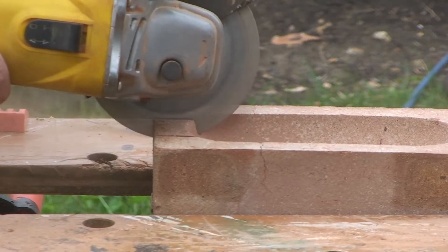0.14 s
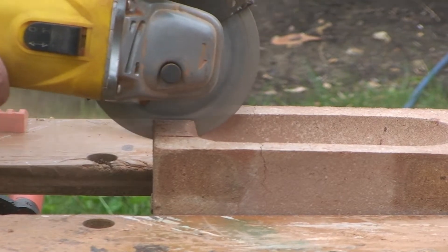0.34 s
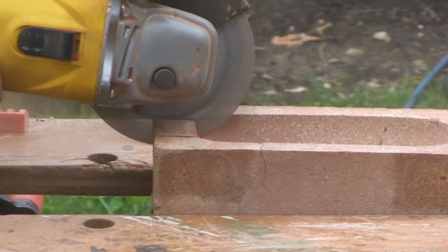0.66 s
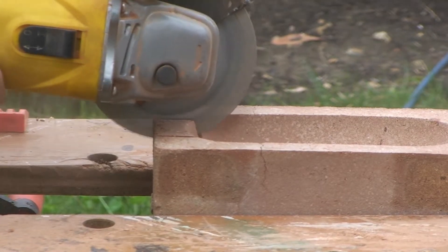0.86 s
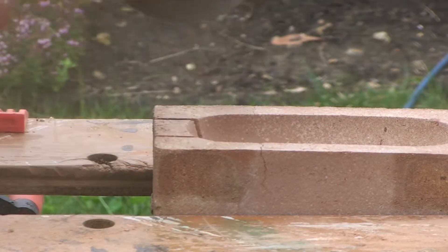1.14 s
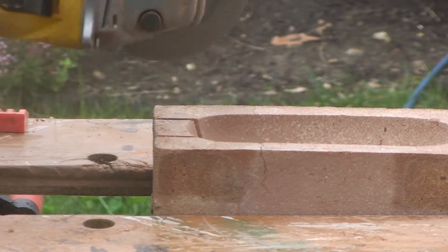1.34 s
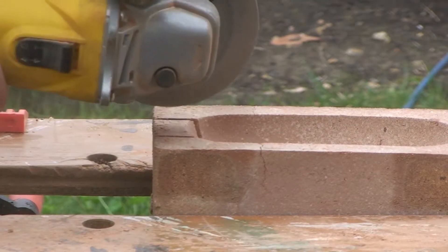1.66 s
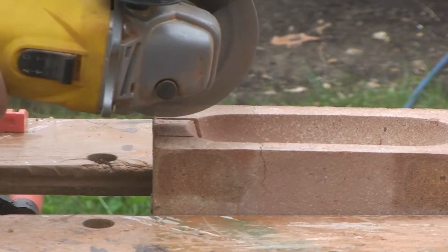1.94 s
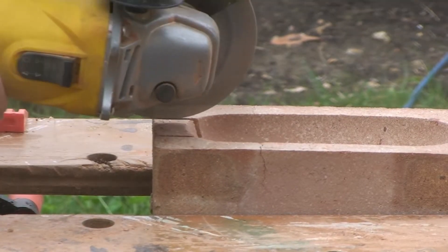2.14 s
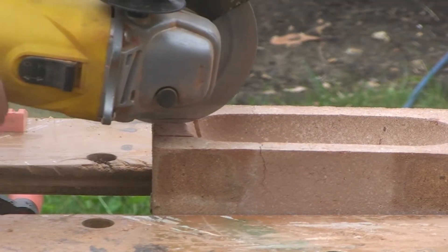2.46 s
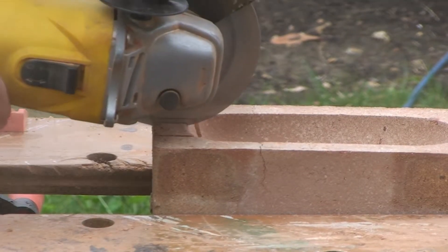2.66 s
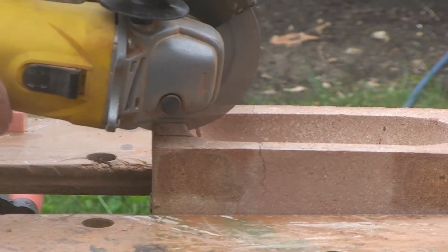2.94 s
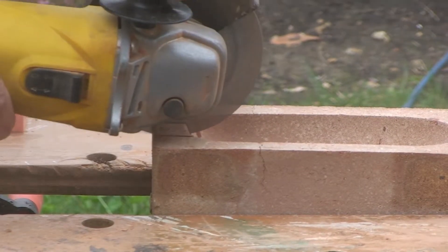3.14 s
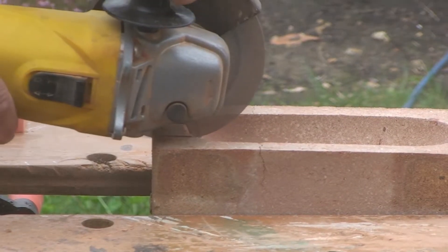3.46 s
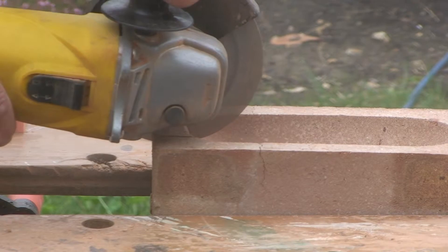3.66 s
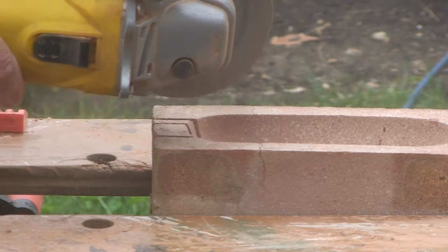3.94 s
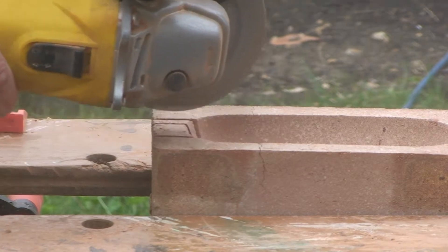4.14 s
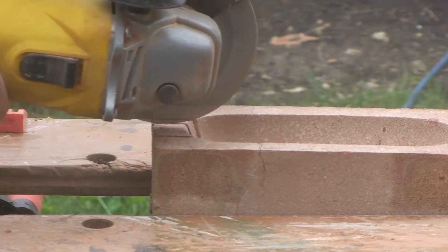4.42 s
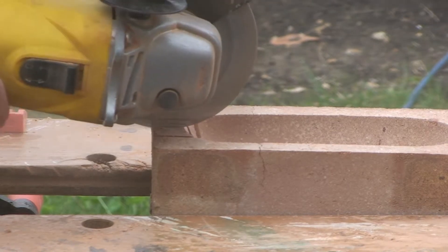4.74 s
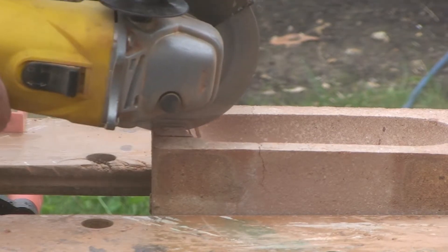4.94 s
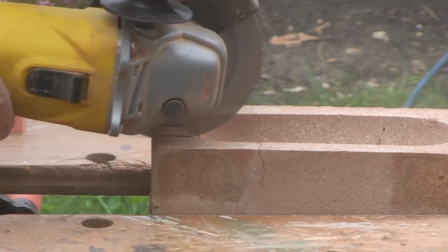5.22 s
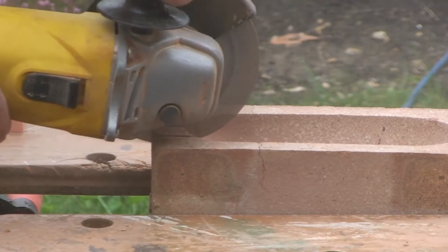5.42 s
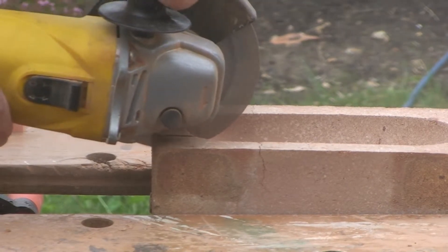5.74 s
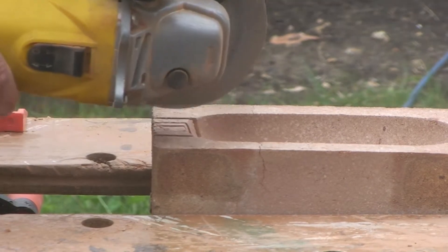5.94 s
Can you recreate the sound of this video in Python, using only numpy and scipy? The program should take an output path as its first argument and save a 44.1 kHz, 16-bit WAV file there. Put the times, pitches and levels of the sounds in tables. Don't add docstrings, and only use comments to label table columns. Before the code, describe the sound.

Outdoors, a power grinder bites brick in three harsh, ringing scrapes, motor pitch dropping in each cut and recovering between, over faint birds.

```python
import sys
import numpy as np
from scipy import signal
from scipy.fft import rfft, irfft, next_fast_len
from scipy.io import wavfile
from scipy.ndimage import uniform_filter1d

SR = 44100
rng = np.random.default_rng(int(sys.argv[2]) if len(sys.argv) > 2 else 0)


def attenuation_scalar(level_db):
    decades = np.asarray(level_db, float) / 20
    return 10 ** decades


def to_wav(s):
    ch = np.atleast_2d(s).T
    pcm = np.round(np.clip(ch, -1, 1) * 32767)
    wavfile.write(sys.argv[1], SR, pcm.astype(np.int16))


N = 268128
T = np.arange(N) / SR
STEP = 32

# (frequency [Hz], level [dB per Hz])
RUMBLE_SPECTRUM = [(12, 6), (22, 1.5), (40, 0), (50, 3), (65, -15.5), (120, -15), (300, -53)]
# (frequency [Hz], level [dB per Hz])
YARD_SPECTRUM = [(12, -45), (22, -9), (42, -1), (81, -0.5), (137, -1), (299, -1), (1280, -10), (2420, -20),
                 (3580, -23.5), (4230, -26.5), (6430, -25), (7500, -28), (9500, -24.5), (15700, -26)]
# (time [s], length [s], first pitch [Hz], last pitch [Hz], level [dB])
BIRD_CALLS = [(.97, 0.065, 5400, 4400, -67), (2.28, .04, 5200, 4200, -65), (3.22, 0.057, 5050, 5000, -70),
              (3.47, .08, 5050, 4800, -70), (4.05, 0.026, 6200, 4700, -62), (4.18, 0.1, 3800, 4080, -68),
              (3.63, .2, 3800, 3800, -75), (4.5, .08, 5300, 5300, -73), (4.2, .12, 5800, 6000, -77),
              (4.73, .07, 4600, 4400, -69), (5.54, .03, 5700, 5000, -70), (2.92, .05, 5050, 5050, -71),
              (.32, .05, 4100, 3900, -72), (4.6, .11, 4250, 4100, -64), (4.7, 0.23, 6900, 6800, -72),
              (4.927, .18, 4200, 4070, -71), (5.024, 0.13, 6750, 6780, -72), (5.06, .3, 8000, 8200, -77)]
# (time [s], length [s], first pitch [Hz], last pitch [Hz], level [dB])
BIRD_TRILLS = [
    (.9, .24, 7500, 7600, -70),
    (1.797, .2, 7100, 7200, -71),
]
QUAVER_HZ, TRILL_HZ = 25, 350

# (time [s], pull of the mesh tone's goal below free speed [Hz])
BRICK_DRAG = [(0.0, 767), (0.55, 1010), (0.72, 444), (0.82, 0), (2.16, 0), (2.28, 211), (2.64, 1021),
              (2.79, 1014), (3.32, 944), (3.56, 812), (3.71, 0), (4.41, 0), (4.72, 601), (5.01, 1860),
              (5.11, 1426), (5.47, 1217), (5.77, 0), (6.08, 0)]
FREE_HZ, START_HZ = 6718, 5803
INERTIA_S = .6475
FULL_LOAD_HZ, SAG_HZ = 1000, 900
# (time [s], nearness [dB], twist of the gear head towards the listener [dB])
TOOL_HOLD = [(0, 1, -1), (.7, 0.5, -1), (.9, -2.5, 5), (.98, -0.5, 6), (1.05, -0.5, -2), (1.4, 0.5, 0.5),
             (2.2, -0.5, 1), (2.6, -0.5, -5), (3.4, 1, -5), (3.75, -0.5, 4), (4.0, 0.5, 7), (4.25, 1, 2),
             (4.6, -0.5, -2), (5.0, 0.5, 4), (5.4, 1, 0), (5.8, -0.5, 5.5), (5.94, -0.5, -2), (6.08, 1, 7)]

# (mesh tone [Hz], roar [dB], upper rush [dB], hiss [dB])
FAN_LEVELS = [(5550, -52, -64, -72), (5930, -51.5, -62.5, -70), (6100, -51.5, -57.5, -70),
              (6530, -49.5, -56, -67), (6940, -45.5, -49, -70)]
# (frequency [Hz], level [dB per Hz])
ROAR_SPECTRUM = [(12, -44), (20, -0.5), (275, -15.5), (418, -11), (481, -15), (537, -11.5), (618, -10.5),
                 (690, -9.5), (816, -10), (2170, 0), (4600, -4.5), (6430, -8), (9240, -18), (12900, -20),
                 (15700, -20)]
# (frequency [Hz], width [Hz], level [dB])
CASING_PEAKS = [(753, 42, 9.5), (1587, 16, 5.5), (1890, 42, -8.5), (2101, 56, -17), (2141, 32, 13.5),
                (2440, 41, 1), (2950, 54, 2.5), (4050, 93, 3.5), (5340, 420, 5)]

PINION, CROWN = 12, 37
# (mesh tone [Hz], mesh [dB], second harmonic [dB], side line one turn above it [dB], rotor unbalance [dB])
GEARCASE_LEVELS = [(5700, -60, -68, -80, -75), (5830, -54, -68, -74, -71), (5950, -54, -71, -76, -70),
                   (6070, -56, -70, -82, -69.5), (6260, -60, -67, -72, -65.5), (6400, -57, -67, -71, -67),
                   (6500, -52.5, -65.5, -68, -65), (6620, -48, -56, -69, -63.5)]
# (mesh, second harmonic, side line, unbalance [dB])
FULL_LOAD_DB = (-8, -5, -3, -9)
# (rotor multiple, level against the mesh [dB])
MESH_NEIGHBOURS = [(13, -14), (10, -22), (15, -25)]
# (rotor multiple, level against the side line [dB])
HARMONIC_NEIGHBOURS = [(26, -8), (23, -11)]
# (disc multiple, level against the rotor line [dB])
GEAR_RATTLE = [(4, -7.5), (8, 0)]

THUMP_MULTIPLES = (1, 5, 6, 7)
# (mesh tone [Hz], level of each of the four thump lines [dB])
BENCH_SHAKE = [(5720, -85, -65.5, -75, -64), (5830, -81, -69, -73, -66.5), (5990, -75, -66, -68, -62),
               (6110, -66.5, -65, -68, -61.5), (6250, -64, -68, -70, -61), (6420, -66, -62, -70, -58.5),
               (6600, -67, -75, -70, -70)]
LIFTED_THUMP_DB = (-24, -7, -11, -8.5)
BITE_HZ = 505
# (time [s], length [s], level [dB], centre frequency [Hz])
RIM_SKIPS = [
    (4.46, .22, -50.5, 3640),
    (3.3, .4, -57, 3650),
    (4.78, .12, -54, 4080),
]

# (time [s], press of the rim on the brick [dB], lean of the disc on the slot wall [dB])
CUT_MOVES = [
    [(0, 0.5, 4), (.2, 0, -2.5), (.55, 1.5, -1), (.7, 0, -5), (.73, 1, 1), (.766, -6, 3), (.8, 5.5, 3),
     (.838, 2, 8), (.88, -22, 2)],
    [(2.3, -6, 2), (2.35, 0.5, -10), (2.6, 1.5, -2), (2.97, 1, 0), (3.04, -2, -7), (3.1, -0.5, -2.5),
     (3.66, 0, -1), (3.73, -12, -6), (3.79, -22, -2)],
    [(4.45, -6, 10), (4.5, -4, -5), (4.76, 3, 3), (4.87, 1, -4), (5.15, 2, -1), (5.27, -0.5, -4),
     (5.68, -1, -1), (5.73, -7.5, 3), (5.82, -14, -6)],
]
# (frequency [Hz], width [Hz], shift per 10 % of speed [Hz], level in cut 1 [dB], cut 2 [dB], cut 3 [dB])
LOW_RING = [(4610, 55, -15, -6, -4, -6), (4712, 45, -10, -10, -7.5, -6.5), (4752, 45, 5, -5, -2.5, -1.5),
            (3450, 50, 10, -11, -14, -15), (3692, 25, 0, -14, -8, -13), (3555, 55, 0, -14, -9, -11),
            (3850, 60, 0, -15, -11, -12), (3980, 80, 10, -11, -13, -12), (4170, 70, 10, -12, -11, -11)]
MID_RING = [(5266, 32, 5, -8, -1, -1.5), (5345, 70, 0, -8, -10, -9), (5438, 58, -10, -2, -4.5, -5),
            (2510, 25, 0, -8, -18, -15), (3120, 60, 10, -8, -14, -8), (5980, 90, 10, -14, -8, -11)]
BRIGHT_RING = [(6418, 58, 19.5, 4.5, 4.5, 2.5), (6730, 72, -10, -12, -14, -10), (7060, 63, 55, -9, -7, -9)]
HIGH_RING = [(7220, 59, 13, -8, -4, -4), (7800, 45, 10, -16, -13, -10), (8075, 35, 25, -20, -7, -13),
             (8360, 78, 35, -7.5, -9, -6.5), (8650, 80, 120, -8, -8.5, -7), (9155, 39, 63, -11, -9, -12),
             (10760, 27, 60, -14, -11.5, -12), (11900, 80, 50, -18, -16, -17),
             (12300, 99, 69, -24, -22, -22), (12750, 90, 58, -22, -13, -27),
             (13250, 180, 30, -13, -17, -17), (14500, 90, 30, -22, -18, -19),
             (15110, 70, 30, -20, -17, -19), (15420, 60, 28, -20, -18, -20)]
# (level at free speed [dB], gain as speed sags [dB], share of the lean [dB per dB], random surge [dB])
RING_GROUPS = [(-53.5, 6, -0.8, 1.4), (-54.5, 0, -0.17, 2), (-68.5, 13.5, 0.28, 0.3), (-66.5, 5, 0.13, .7)]
SURGES_PER_S = 6.6
# (frequency [Hz], level [dB per Hz])
GRIT_SPECTRUM = [(600, -10.5), (1500, -3.5), (3000, 0), (5000, 7.5), (6150, -21), (7000, 9.5), (9500, -16),
                 (13000, 0), (15800, -8)]
# (disc multiple, level in cut 1 [dB], cut 2 [dB], cut 3 [dB])
BURIED_LINES = [(10, -83, -66, -76), (13, -63.5, -74, -67)]


def evened(x):
    return x / np.sqrt(np.mean(x ** 2) + 1e-20)


def read(points, hz):
    f, value = np.transpose(points)
    return np.interp(np.log(hz + 1), np.log(f + 1), value)


def curves(rows, at):
    first, *columns = np.transpose(rows)
    return [np.interp(at, first, column) for column in columns]


def chance(rate_hz, size):
    low = signal.butter(2, rate_hz, fs=SR / STEP, output="sos")
    return evened(signal.sosfilt(low, rng.standard_normal(size // STEP + 2)))


def fine(slow, size):
    return np.interp(np.arange(size) / STEP, np.arange(len(slow)), slow)


def drift(rate_hz, size):
    return fine(chance(rate_hz, size), size)


def noise(field_db, patchy_db):
    frames = N // 256 + 5
    hz = np.fft.rfftfreq(1024, 1 / SR)[:, None]
    a, b, patches = rng.standard_normal((frames, 513, 3)).T
    patches = uniform_filter1d(patches, size=14, axis=0)
    patches = evened(uniform_filter1d(patches, size=12, axis=1))
    level_db = field_db(hz, np.arange(frames) * 256 / SR) + patchy_db * patches
    z = (a + 1j * b) * attenuation_scalar(level_db)
    return signal.istft(z, nperseg=1024, noverlap=768)[1][:N]


def steady_noise(spectrum, patchy_db):
    return evened(noise(lambda hz, s: read(spectrum, hz) + 0 * s, patchy_db))


def line(turns, db, waver_db=1.0, waver_hz=9, slip=0.049):
    size = len(turns)
    waver = fine(attenuation_scalar(waver_db * chance(waver_hz, size)), size)
    phase = turns + slip * drift(41, size) + rng.random()
    return np.sqrt(2) * attenuation_scalar(db) * waver * np.cos(2 * np.pi * phase)


def resonate(x, hz, width):
    r = np.exp(-np.pi * width / SR)
    stage = [1, 0, -1, 1, -2 * r * np.cos(2 * np.pi * hz / SR), r * r]
    return evened(signal.sosfilt([stage, stage], x))


def rumble():
    size = next_fast_len(N)
    shape = attenuation_scalar(read(RUMBLE_SPECTRUM, np.fft.rfftfreq(size, 1 / SR)))
    deep = irfft(rfft(rng.standard_normal(size)) * shape, size)[:N]
    lumps = attenuation_scalar(1.5 * drift(3, N))
    return attenuation_scalar(-65.5) * lumps * evened(deep)


def yard():
    return attenuation_scalar(-54.5) * steady_noise(YARD_SPECTRUM, patchy_db=1.5)


def birds():
    out = np.zeros(N)
    for rows, swing_hz in ((BIRD_CALLS, QUAVER_HZ), (BIRD_TRILLS, TRILL_HZ)):
        for s, length, first_hz, last_hz, db in rows:
            u = np.arange(0, 1, 1 / (length * SR))
            glide = first_hz + (last_hz - first_hz) * np.sqrt(u)
            hz = glide + swing_hz * np.sin(2 * np.pi * 22 * length * u)
            swell = attenuation_scalar(db + 12 - 6.9 * u) * np.sin(np.pi * u) ** .4
            call = swell * np.sin(2 * np.pi * np.cumsum(hz) / SR)
            out[round(s * SR):][:len(u)] += call
    return out


def mesh_tone():
    r = np.exp(-1 / (INERTIA_S * SR))
    goal_hz = FREE_HZ - curves(BRICK_DRAG, T)[0]
    return signal.lfilter([1 - r], [1, -r], goal_hz, zi=[r * START_HZ])[0]


def rotor_turns(mesh_hz):
    return np.cumsum(mesh_hz / PINION) / SR


def fan(mesh_hz):
    def field_db(hz, t):
        near_db = curves(TOOL_HOLD, t)[0]
        levels = [c - c.mean() + near_db for c in curves(FAN_LEVELS, np.interp(t, T, mesh_hz))]
        corners_hz = [150, 600, 3000, 5500, 7000, 9500]
        place = np.interp(np.log(hz + 1), np.log(corners_hz), [-0.79, 0.034, 0.57, 0.26, 1.6, 1.87])
        level = sum(np.clip(1 - abs(place - k), 0, 1) * c for k, c in enumerate(levels))
        casing = sum(db / (1 + (2 * (hz - f) / width) ** 2) for f, width, db in CASING_PEAKS)
        return read(ROAR_SPECTRUM, hz) + casing + level
    return attenuation_scalar(-46.5) * evened(noise(field_db, patchy_db=1.2)) * attenuation_scalar(.3 * drift(12, N))


def motor(turns, mesh_hz):
    load = np.minimum(curves(BRICK_DRAG, T)[0] / FULL_LOAD_HZ, 1.3)
    near_db, twist_db = curves(TOOL_HOLD, T)
    mesh_db, second_db, side_db, rotor_db = (
        db + near_db + lost_db * load
        for db, lost_db in zip(curves(GEARCASE_LEVELS, mesh_hz), FULL_LOAD_DB))
    mesh_db = mesh_db - .9 * twist_db
    second_db = second_db + .9 * twist_db
    out = line(PINION * turns, mesh_db, waver_db=2.2)
    out += line(2 * PINION * turns, second_db, waver_db=3.2, waver_hz=8)
    out += line((2 * PINION + 1) * turns, side_db, waver_db=1.5, waver_hz=8)
    out += line(turns, rotor_db, waver_db=1.2)
    out += sum(line(np.round(k) * turns, mesh_db + db) for k, db in MESH_NEIGHBOURS)
    out += sum(line(k * turns, side_db + db) for k, db in HARMONIC_NEIGHBOURS)
    disc_turns = turns * PINION / CROWN
    out += sum(line(np.round(k) * disc_turns, rotor_db + db) for k, db in GEAR_RATTLE)
    return out


def disc(turns, mesh_hz):
    turns = turns * PINION / CROWN
    lifted = np.clip(1 - curves(BRICK_DRAG, T)[0] / BITE_HZ, 0, 1)
    out = sum(line(k * turns, db + lifted * lost_db, waver_db=2.0)
              for k, db, lost_db in zip(THUMP_MULTIPLES, curves(BENCH_SHAKE, mesh_hz), LIFTED_THUMP_DB))
    knocks = np.diff(np.floor(turns), prepend=0) * attenuation_scalar(1.5 * drift(60, N))
    for s, length, db, hz in RIM_SKIPS:
        skip = np.sin(np.pi * np.clip((T - s) / length, 0, 1))
        out += attenuation_scalar(db) * skip * resonate(knocks, hz, 390)
    return out


def mode(t, spin, hz, width, shift_hz):
    a, b = (chance(width / 2, len(t)) + 0.08 * chance(2.2 * width, len(t)) for _ in range(2))
    wander = np.cumsum(0.1495 * width * chance(2.94, len(t))) * STEP / SR
    size = np.hypot(a, b) ** .85 * attenuation_scalar(1.1 * chance(5, len(t)))
    phase = fine(np.unwrap(np.arctan2(b, a)) + 2 * np.pi * wander, len(t))
    return fine(size, len(t)) * np.cos(2 * np.pi * (hz * t + 10 * shift_hz * spin) + phase)


def cut(index, rows, turns, mesh_hz, grit):
    start, stop = round(rows[0][0] * SR), round(rows[-1][0] * SR)
    t, turns = T[start:stop], turns[start:stop]
    press_db, lean_db = curves(rows, t)
    sag = (FREE_HZ - mesh_hz[start:stop]) / SAG_HZ
    low_db, mid_db, bright_db, high_db = (
        press_db + db + gain_db * sag + share * lean_db + surge_db * drift(SURGES_PER_S, len(t))
        for db, gain_db, share, surge_db in RING_GROUPS)
    spin = turns / 510 - t

    def ring(modes):
        return sum(attenuation_scalar(m[3 + index]) * mode(t, spin, *m[:3]) for m in modes)

    out = attenuation_scalar(low_db - 5.0) * ring(LOW_RING)
    out += attenuation_scalar(mid_db - 3.0) * ring(MID_RING)
    out += attenuation_scalar(bright_db - 1.0) * ring(BRIGHT_RING)
    dust = attenuation_scalar(1.15 * drift(30, len(t)))
    out += attenuation_scalar(high_db + 5.5) * dust * (ring(HIGH_RING) + attenuation_scalar(1.5) * grit[start:stop])
    out *= attenuation_scalar(0.4 * drift(30, len(t)))
    disc_turns = turns * PINION / CROWN
    buried = sum(line(np.round(b[0]) * disc_turns, b[1 + index]) for b in BURIED_LINES)
    out += buried * np.clip((t[-1] - t) / 0.094, 0, 1)
    ease_in = (t - t[0] + (start == 0)) / 0.094
    leave = (t[-1] - t) / 0.019
    touch = np.clip(np.minimum(ease_in, leave), 0, 1)
    return np.pad(out * touch, (start, N - stop))


def scene():
    mesh_hz = mesh_tone()
    turns = rotor_turns(mesh_hz)
    grit = steady_noise(GRIT_SPECTRUM, patchy_db=0.2)
    sides = yard() + birds()
    middle = rumble() + fan(mesh_hz) + motor(turns, mesh_hz) + disc(turns, mesh_hz)
    middle += sum(cut(k, rows, turns, mesh_hz, grit) for k, rows in enumerate(CUT_MOVES))
    return np.array([middle + sides, middle - sides])


def low_pass(x):
    return signal.sosfilt(signal.butter(12, 15770, fs=SR, output="sos"), x)


def record(dry):
    return low_pass(dry)


dry = scene()
out = record(dry)
to_wav(out)
```